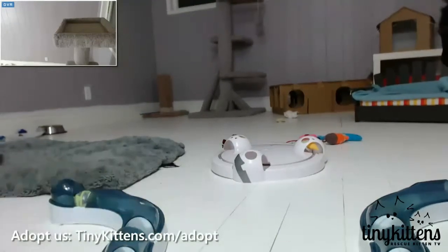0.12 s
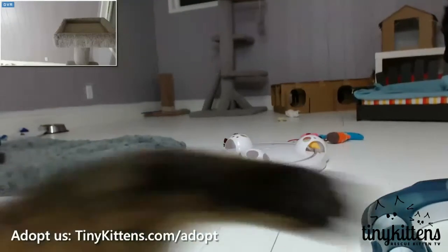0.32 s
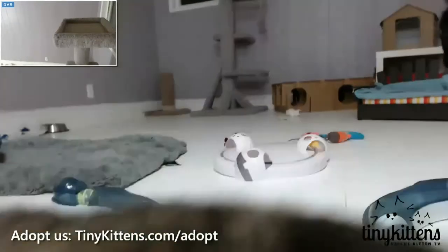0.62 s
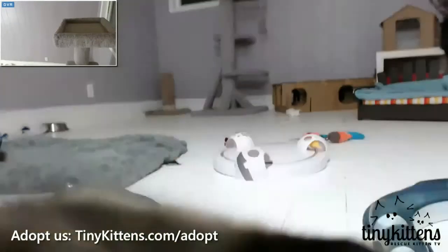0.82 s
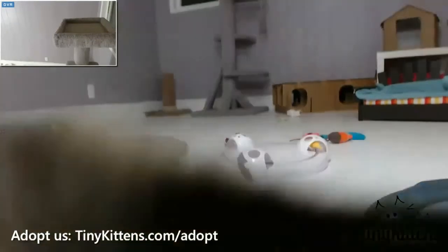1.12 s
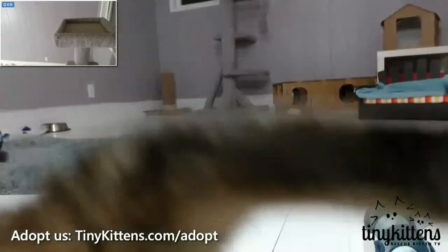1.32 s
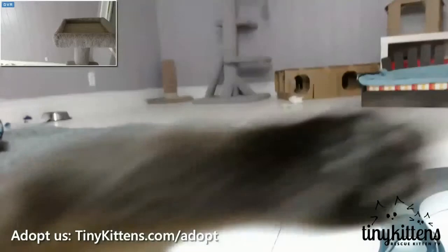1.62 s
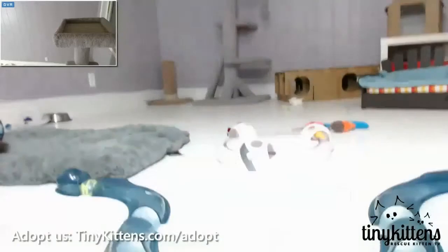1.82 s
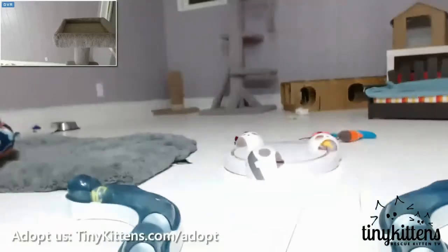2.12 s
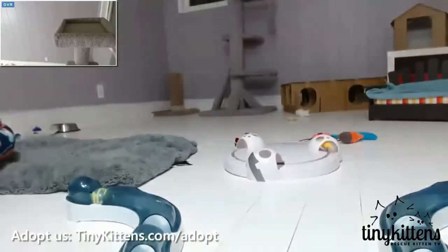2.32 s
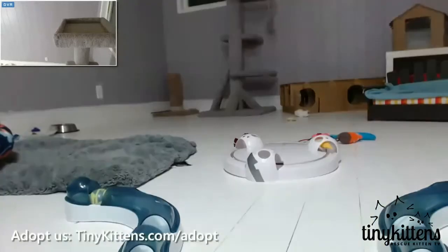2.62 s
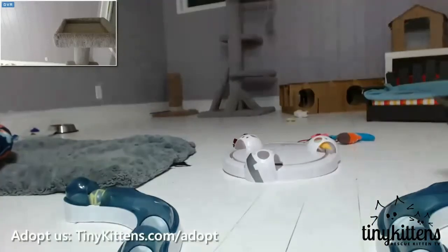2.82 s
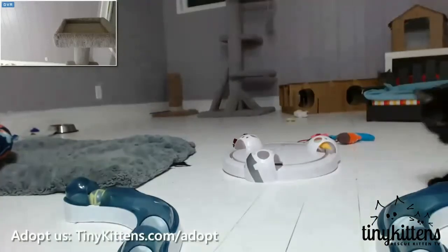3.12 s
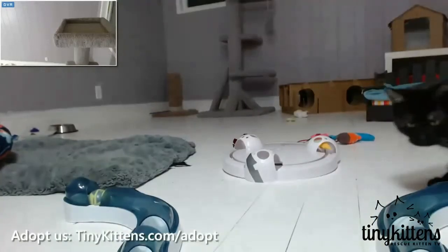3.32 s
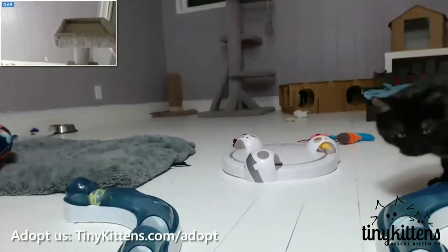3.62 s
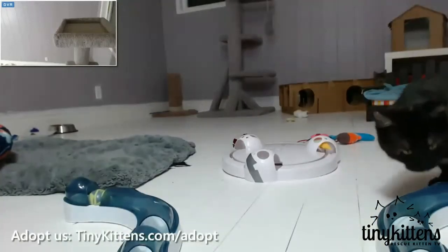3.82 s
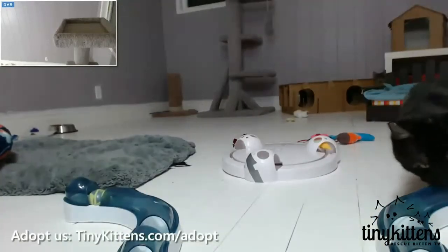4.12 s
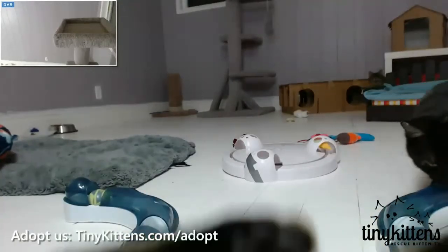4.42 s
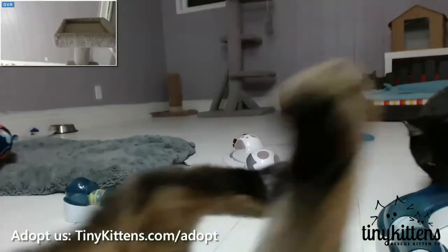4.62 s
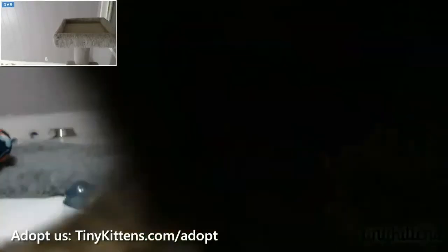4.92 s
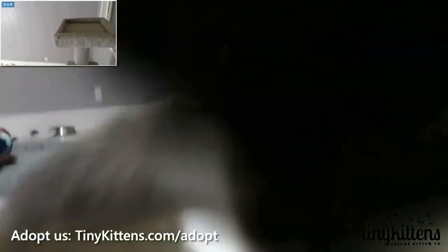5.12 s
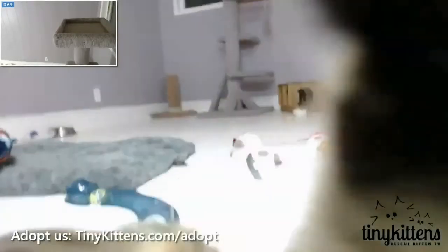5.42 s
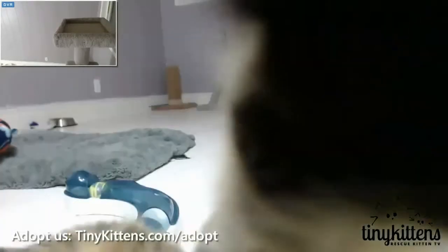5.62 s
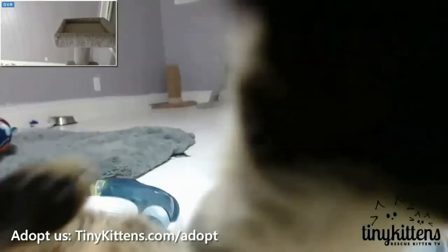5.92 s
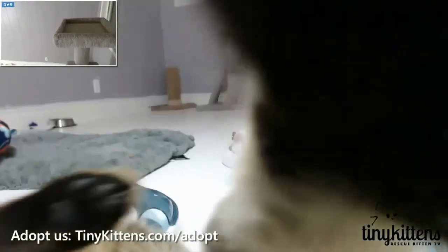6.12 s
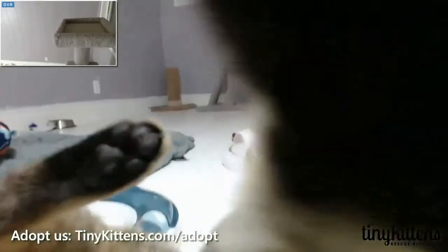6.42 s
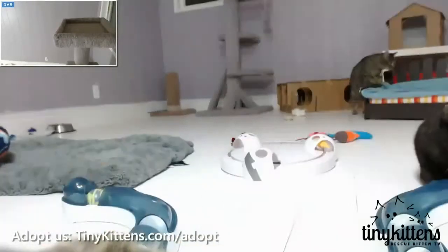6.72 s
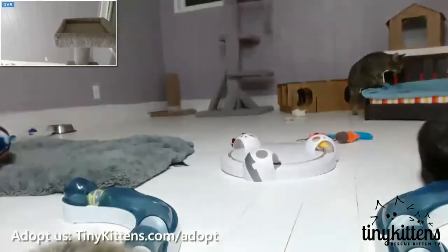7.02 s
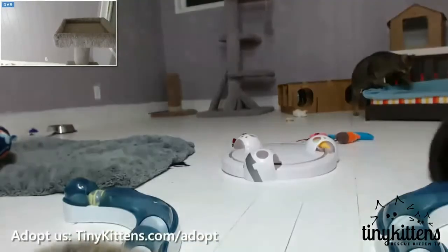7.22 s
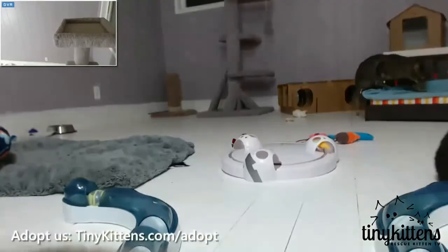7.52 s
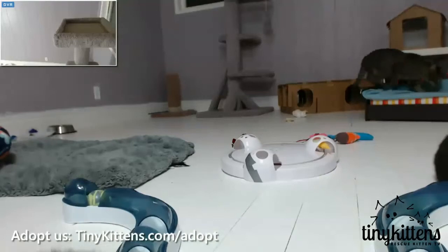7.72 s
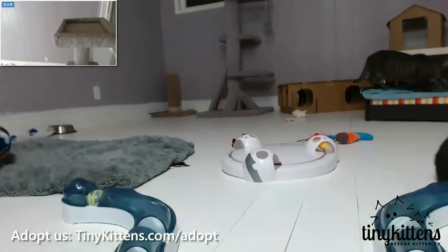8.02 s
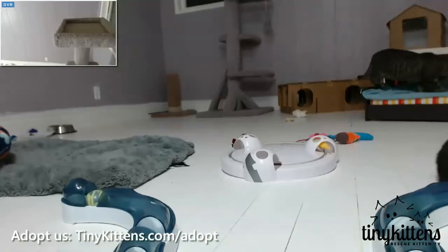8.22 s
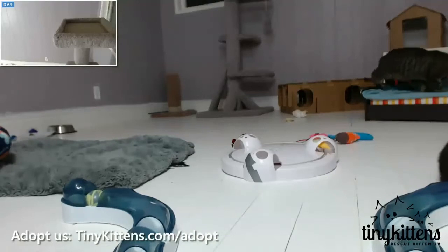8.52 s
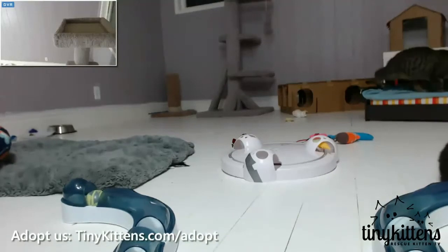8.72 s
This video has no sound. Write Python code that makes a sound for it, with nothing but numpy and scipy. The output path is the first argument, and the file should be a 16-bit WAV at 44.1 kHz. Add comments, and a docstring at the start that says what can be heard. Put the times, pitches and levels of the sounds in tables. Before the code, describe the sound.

A quiet room holds a soft low fan hum, airy noise and a very faint, high pulsing electronic whine. From about 0.15 s a cat rubs a plastic camera at its microphone: claw ticks, grainy fur strokes and small thumps until 0.7 s, then softer brushing and creaks. A low bump lands at 1.4 s, with more crackly rubbing and hollow knocks around 2.05 to 2.45 s. It thins to light rustles by 3.1 s. In the lull, a faint tap sounds at 3.5 s and a clearer echoing double tap at 4.5 s, far across the room. At 5.16 s a loud knock starts violent scraping, peaking from 5.55 to 5.85 s with distorted, overloaded blows and bright crackle. Separate hard knocks follow at 6.35 and 6.75 s, smaller clicks and soft rubbing at 7.3 to 8 s, then mostly hum until 8.8 s.

```python
"""A quiet room with a fan hum and a faint pulsing whine; soon a cat bumps and rubs a small plastic camera.
Hum and air are filtered noise, the whine is a gated sine, and slow noise is the base rocking.
Grainy noise is fur on the housing and microphone port; short noise bursts ring them as claws and creaks.
Fading low sines are blows on the base, echoing noise is distant taps; loud knocks overload the input."""
import sys
import numpy as np
from scipy import signal
from scipy.fft import rfft, irfft
from scipy.io import wavfile
from scipy.ndimage import uniform_filter1d

SR = 44100
rng = np.random.default_rng(int(sys.argv[2]) if len(sys.argv) > 2 else 0)


def persist_wave(psi):
    """Save psi, clipped to +-1, as 16-bit WAV."""
    counts = np.round(np.clip(psi, -1, 1) * 32767).astype(np.int16)
    wavfile.write(sys.argv[1], SR, np.atleast_2d(counts).T)


N = 389403  # length in samples

# Ringing tones of the plastic housing. Each row: frequency in Hz, width in Hz, gain in dB.
HOUSING_MODES = [(600, 160, -6), (880, 150, -4), (1400, 80, 0), (1900, 600, -14)]
# Ringing tones of the microphone port. Each row: frequency in Hz, width in Hz, gain in dB.
PORT_MODES = [(2690, 1100, -1.5), (3435, 810, 12.5), (5470, 500, -17)]


def undb(db):
    """Turn decibels into a plain multiplier."""
    return 10 ** (np.asarray(db) / 20)


def level(x, db):
    """Scale a sound to an average (RMS) level in dB."""
    return x * undb(db) / np.sqrt(np.mean(x ** 2))


def peak(rows, db):
    """Scale each row so that its highest point reaches a level in dB."""
    return rows * (undb(db) / np.abs(rows).max(axis=1))[:, None]


def band(x, lo_hz, hi_hz):
    """Keep mainly the frequencies between two limits."""
    return signal.sosfilt(signal.butter(2, [lo_hz, hi_hz], "band", fs=SR, output="sos"), x)


def ring(x, modes):
    """Two-pole resonances side by side, added with alternate signs."""
    total = 0
    for k, (hz, width_hz, db) in enumerate(modes):
        b, a = signal.iirpeak(hz, hz / width_hz, SR)
        total = total + (-1) ** k * undb(db) * signal.lfilter(b, a, x)
    return total


def colour(x, points):
    """Shape a spectrum by gains in dB, joined by straight lines over log frequency."""
    hz, db = np.transpose(points)
    f = np.arange(x.shape[-1] // 2 + 1) * SR / x.shape[-1] + 1  # + 1 avoids log(0)
    return irfft(rfft(x) * undb(np.interp(np.log(f), np.log(hz), db)), x.shape[-1])


def curve(table):
    """Join (seconds, value) points by straight lines over the whole scene."""
    s, values = np.transpose(table)
    return np.interp(np.arange(N) / SR, s, values)


def walk(rate):
    """Random levels held 1 / rate seconds and smoothed twice; spread near 1."""
    hold = int(SR / rate)
    steps = np.repeat(rng.standard_normal(N // hold + 1), hold)
    return 1.3 * uniform_filter1d(uniform_filter1d(steps, hold), hold)[:N]


def place(times, sounds):
    """Add each sound into the scene at its start time in seconds."""
    out = np.zeros(N + sounds.shape[1])
    for s, sound in zip(times, sounds):
        start = int(s * SR)
        out[start:start + len(sound)] += sound
    return out[:N]


def room():
    """Air and fan noise with wavering hum lines and a few thin steady tones."""
    # Spectrum of the air noise. Each row: frequency in Hz, relative density in dB per Hz.
    air_colour = [(12, -57), (20, -25), (53, -23.5), (86, -5), (145, -12), (170, -9), (381, -20),
                  (412, -28), (732, -31), (791, -34.5), (10200, -54.5), (13300, -83.5), (22000, -120)]
    # Hum of the fan. Each row: frequency in Hz, width in Hz, level in dB.
    fan_lines = [(87.7, 1.1, -52), (120, 6.2, -53), (174.8, 12, -59)]
    # Steady tones. Each row: frequency in Hz, level in dB.
    steady_tones = [(721.4, -71.5), (5459, -82), (10541, -86.5)]
    t = np.arange(N) / SR
    total = level(colour(rng.standard_normal(N), air_colour), -50)
    for hz, width_hz, db in fan_lines:
        hum = band(rng.standard_normal(N), hz - width_hz / 2, hz + width_hz / 2)
        total += level(hum * undb(1.5 * walk(4)), db)
    for hz, db in steady_tones:
        total += np.sqrt(2) * undb(db) * np.sin(2 * np.pi * hz * t)
    return total


def whine():
    """A high tone leaks from the electronics as short blips in a repeating strong-weak pattern."""
    # Strength of each blip in one round, in dB.
    blip_db = [-69, -85.5, -100, -80.5]
    whine_hz, blips_per_s = 8000, 60
    pattern_s = 3.716  # a moment when the first blip of a round is at its middle
    t = np.arange(N) / SR
    turn = (t - pattern_s) * blips_per_s + .5
    gate = np.exp(-((turn % 1 - .5) / .24) ** 4)
    strength = undb(blip_db)[np.floor(turn).astype(int) % len(blip_db)]
    return strength * gate * np.sin(2 * np.pi * whine_hz * t)


def rock():
    """The cat's weight tilts the base: slow pressure swings on the microphone, made of low noise."""
    # Strength of the rocking. Each row: time in seconds, gain in dB.
    rock_gain = [(0.0, -48), (.7, -48), (1.35, -39.5), (1.6, -45.5), (2.3, -34), (2.65, -47), (5.2, -58),
                 (5.65, -26.5), (6.1, -44.5), (8.83, -60)]
    swings = level(band(rng.standard_normal(N), 18, 66), -1)
    return undb(curve(rock_gain) + 2.5 * walk(12)) * swings


def pressure():
    """Gains of the steady lean, of the strokes that swell and fade over it, and of the treble of both."""
    # How hard the coat leans between strokes. Each row: time in seconds, gain in dB.
    lean_gain = [(0, -62), (.3, -56.5), (.45, -53), (.85, -58), (1.3, -58), (1.7, -52), (2.15, -50.5),
                 (2.6, -57), (3.5, -76), (5.05, -94), (5.25, -63.5), (5.8, -51), (5.9, -56.5), (6.2, -57.5),
                 (7.1, -63), (7.5, -58.5), (7.65, -56), (7.78, -54), (8.25, -64.5), (8.83, -66.5)]
    # Strokes of fur. Each row: middle in seconds, length in seconds, gain in dB, treble re that gain in dB.
    fur_strokes = [(0.213, 0.035, -40, -15), (0.384, 0.18, -47, -9.5), (0.489, 0.13, -43, -8),
                   (0.59, 0.038, -45, -5.5), (0.704, 0.12, -49.5, -10), (0.948, 0.15, -49.5, -9),
                   (1.085, 0.14, -44, -10.5), (1.417, 0.2, -54.5, -2.5), (1.616, 0.055, -41, -7.5),
                   (2.05, 0.1, -48.5, 1), (2.111, 0.016, -40, -12), (2.199, 0.036, -41.5, -7.5),
                   (2.835, 0.046, -44.5, -12), (3.08, 0.29, -59, -2.5), (5.109, 0.035, -45.5, -5.5),
                   (5.212, 0.092, -43, 1), (5.305, 0.039, -43, 7), (5.456, 0.15, -48.5, 4.5),
                   (5.63, 0.075, -34.5, -9), (5.687, 0.067, -28.5, -6), (5.738, 0.03, -25, 0.5),
                   (5.792, 0.12, -32.5, 2.5), (5.871, 0.02, -44.5, 7.5), (5.919, 0.039, -56, 3),
                   (6.148, 0.29, -50, -4.5), (6.323, 0.089, -50, 0), (6.483, 0.05, -51, -21),
                   (6.61, 0.15, -65.5, 8.5), (6.774, 0.091, -38.5, -6), (7.222, 0.032, -46.5, -15),
                   (7.43, 0.27, -51.5, -2), (7.59, 0.022, -54, 2), (7.73, 0.11, -53, -10),
                   (7.893, 0.11, -49, -28), (7.985, 0.1, -52.5, -32), (8.097, 0.15, -54.5, -7)]
    edge_db = -14  # gain at a stroke's ends, relative to its middle
    point = 2.0  # shape of a stroke: 1 pointed, 2 round
    lean_treble_db = -8  # relative to the lean
    t = np.arange(N) / SR
    lean = undb(curve(lean_gain))
    # add powers, so that overlapping strokes do not count double in gain
    body_power = np.zeros(N)
    treble_power = lean ** 2 * undb(2 * lean_treble_db)
    for middle, length, db, treble_db in fur_strokes:
        near = slice(max(int((middle - 2 * length) * SR), 0), int((middle + 2 * length) * SR))
        distance = np.abs(2 * (t[near] - middle) / length)  # 1 at the ends of the stroke
        power = undb(2 * (db + edge_db * distance ** point))
        body_power[near] += power
        treble_power[near] += power * undb(2 * treble_db)
    return lean, np.sqrt(body_power), np.sqrt(treble_power)


def shifting_ring(hairs, modes):
    """Hair noise rings each mode, whose strength drifts on its own."""
    return level(sum(ring(hairs, [mode]) * undb(3.5 * walk(25)) for mode in modes), 0)


def shifting_brush(hairs, lowest_hz):
    """Six neighbouring bands of hair noise, each drifting on its own, brush in shifting patches."""
    edges_hz = lowest_hz * 1.3 ** np.arange(6)
    return level(sum(band(hairs, hz, 1.3 * hz) * undb(2.2 * walk(30)) for hz in edges_hz), 0)


def rub():
    """Hairs catch and let go in dense grains; a lean rings the housing, a stroke also brushes in patches."""
    lean, stroke, treble = pressure()
    hairs = rng.standard_normal(N) * undb(4.2 * walk(500) + .8 * walk(70))
    body = shifting_ring(hairs, HOUSING_MODES)
    fizz = shifting_ring(hairs, PORT_MODES)
    brush = shifting_brush(hairs, 480)
    sheen = shifting_brush(hairs, 1900)
    stroke_sound = undb(-5) * body + undb(-4.0) * brush
    dull = band(lean * body + stroke * stroke_sound, 300, 1700)
    bright = band(undb(-3.5) * fizz + undb(-6) * sheen, 1300, 6800)
    return dull + treble * bright


def knocks():
    """Claw ticks and creaks: a burst of tiny slips rings housing and port; a faint rattle follows."""
    # Each row: start in seconds, housing peak in dB, port peak in dB, contact length in seconds.
    knock_rows = [(0.14, -29, -45, 0.0022), (0.194, -16, -24, 0.00068), (0.198, -24.5, -23.5, 0.004),
                  (0.357, -16, -37, 0.001), (0.362, -40, -34, 0.0029), (0.422, -19, -37, 0.0079),
                  (0.499, -22, -33.5, 0.0057), (0.504, -16.5, -34, 0.0021), (0.558, -33.5, -42, 0.0036),
                  (0.72, -37, -60, 0.0037), (0.836, -38, -57, 0.0025), (1.042, -34, -56, 0.00095),
                  (1.116, -28, -64, 0.0015), (1.197, -46, -67, 0.003), (1.305, -33, -47, 0.0057),
                  (1.325, -32.5, -48, 0.0091), (1.365, -30.5, -41, 0.0032), (1.396, -34.5, -36.5, 0.016),
                  (1.562, -24, -41.5, 0.006), (1.667, -34, -44, 0.0022), (1.711, -32.5, -42, 0.0026),
                  (1.726, -35.5, -44, 0.0052), (1.773, -31, -40.5, 0.0026), (1.796, -33, -41, 0.0051),
                  (1.826, -27.5, -50, 0.0029), (1.865, -32.5, -42, 0.0039), (1.918, -24, -49.5, 0.01),
                  (2.035, -32, -47, 0.0067), (2.173, -37, -40, 0.0036), (2.258, -12, -40, 0.0015),
                  (2.267, -24.5, -35, 0.0089), (2.277, -95, -17.5, 0.0024), (2.376, -29, -54, 0.0019),
                  (2.406, -18.5, -27, 0.0029), (2.637, -39.5, -51, 0.017), (2.703, -38, -41.5, 0.002),
                  (2.823, -36, -50, 0.005), (3.012, -33, -73, 0.0048), (3.06, -27.5, -40, 0.0084),
                  (3.52, -35, -33.5, 0.0051), (5.162, -2, -10.5, 0.0028), (5.167, -13, -8, 0.0021),
                  (5.231, -10, -25.5, 0.0015), (5.242, -25, -39, 0.004), (5.299, -30, -33, 0.0011),
                  (5.409, -23, -28, 0.0096), (5.469, -20, -17, 0.0045), (5.529, -13, -19.5, 0.0024),
                  (5.578, 4.5, -10, 0.0021), (5.581, -6, -6.5, 0.0042), (5.587, -12.5, -12.5, 0.0092),
                  (5.697, -16, -39.5, 0.0018), (5.753, -3.5, -10.5, 0.0016), (5.845, -13, -13, 0.0031),
                  (5.922, -27, -36, 0.00078), (5.992, -42, -30.5, 0.00064), (6.082, -26.5, -44, 0.012),
                  (6.35, -9, -15.5, 0.0023), (6.597, -41, -32.5, 0.0022), (6.747, -23.5, -38.5, 0.0014),
                  (6.756, -7.5, -22, 0.0027), (6.76, -8, -10.5, 0.0067), (6.783, -15, -13, 0.0023),
                  (7.015, -34, -44, 0.0015), (7.323, -16.5, -26, 0.0044), (7.401, -34, -61, 0.0016),
                  (7.414, -19.5, -24, 0.0018), (7.443, -28, -43, 0.0068), (7.696, -27, -37, 0.0073),
                  (7.813, -24.5, -35.5, 0.0055), (7.973, -38.5, -63, .003)]
    s, db, port_db, contact = np.transpose(knock_rows)
    t = np.arange(4096) / SR
    burst = np.exp(-(t / np.clip(contact, .0003, .05)[:, None]) ** 2)
    rattle = undb(-25.5) * np.exp(-t / 0.012)
    chance = rng.standard_normal((len(s), 2, len(t)))
    slips = chance[:, 0] * undb(1.5 * chance[:, 1]) * (burst + rattle)
    # a hard blow shakes the whole shell, so its clear modes stand out less
    shell = undb(22.5 + 1.4 * db)[:, None] * slips
    body = band(band(ring(slips, HOUSING_MODES) + shell, 720, 2660), 190, 2800)
    # the more the housing outweighs the port, the weaker the port's top end
    top = peak(band(slips, 4000, 10000), 0.23 * (port_db - db))
    port = peak(band(ring(slips, PORT_MODES), 2000, 4500), 0) + top
    return place(s, peak(body, db) + peak(port, port_db))


def thumps():
    """Each blow swings the base, widest early on, slowing and wavering as it dies; a hollow rumble trails."""
    # Blows on the base. Each row: start in seconds, strength in dB, ring in Hz,
    # time to fade by 60 dB in seconds, peak of the rumble relative to the strength in dB.
    blows = [(0.192, -20.5, 80, 0.061, -5), (1.017, -29, 102, 0.052, -34), (1.302, -23, 86, 0.17, -0.5),
             (1.398, -9.5, 72.5, 0.024, -27), (1.618, -30, 81.3, 0.34, -15), (1.915, -35.5, 88, 0.8, -7),
             (2.029, -23, 79, 0.049, -16), (2.091, -29, 101, 0.15, -32), (2.255, -16, 77, 0.21, 0),
             (2.38, -18, 151, 0.11, -1.5), (2.435, -10.5, 268, 0.061, -7.5),
             (2.448, -38.5, 270, 0.39, 16.5), (2.593, -31.5, 93, 0.42, -20), (3.061, -31, 140, 0.066, 5.5),
             (5.161, -12.5, 121, 0.03, -5), (5.432, -25, 47, 0.16, -11.5), (5.577, -12, 320, 0.047, 4),
             (5.589, -6, 261, 0.019, -3.5), (5.676, -25.5, 148.3, 0.22, 8.5), (5.73, -16, 200, 0.035, -9),
             (5.752, -12.5, 300, 0.031, -4), (5.81, -17.5, 160.6, 0.3, -9.5), (6.314, -18, 45.7, 0.16, -9),
             (6.757, -22.5, 106.6, 0.087, 7.5), (6.78, -15.5, 60.5, 0.12, -22),
             (7.324, -22.5, 120, 0.035, -12), (7.414, -26.5, 45, 0.18, -12), (7.51, -34, 116, 0.22, -42),
             (7.702, -34, 50, 0.35, -1.5)]
    s, db, hz, t60, rumble_db = np.array(blows).T[:, :, None]
    t = np.arange(16384) / SR
    fade = np.exp(-np.log(1000) * t / t60) * (1 - np.exp(-t * hz / 0.096))
    chance = rng.standard_normal((len(s), 2, len(t)))
    drift = peak(np.cumsum(band(chance[:, 0], 8, 40), axis=1), 3)  # radians
    waver = drift * np.minimum(t / .04, 1)
    early = 0.0024 * (1 - np.exp(-t / 0.0057))  # the swing starts fast, then settles to its pitch
    swing = np.sin(2 * np.pi * hz * (t + early) + waver) * (0.79 * fade + 2.6 * fade ** 4)
    rumble = band(band(band(chance[:, 1], 130, 620) * fade ** 0.83, 130, 700), 90, 1200)
    return place(s[:, 0], undb(db) * (swing + peak(rumble, rumble_db[:, 0])))


def far_taps():
    """Taps across the room arrive mostly as their echo; the tapped thing rings on in it."""
    # Each row: start in seconds, strength in dB, time for the tail to fade by 60 dB in seconds,
    # tilt in dB per octave.
    tap_rows = [(3.524, -49.5, 0.7, 15), (4.52, -35, 0.36, 5.5), (4.533, -42.5, 0.82, 4.5)]
    # Spectrum of the echo before its tilt. Each row: frequency in Hz, relative density in dB per Hz.
    echo_colour = [(470, -52), (800, -2), (1400, 5.5), (2120, 2), (3080, -10.5), (5220, -15), (11000, -37),
                   (22000, -120)]
    # Tones of what is tapped. Each row: frequency in Hz, gain in dB, time to fade by 60 dB in seconds.
    tapped_modes = [(1540, -19, 0.24), (1625, -12.5, 0.45), (2200, -17, 0.38), (3320, -13.5, 0.45),
                    (5950, -3, 0.12), (7500, -16, .1)]
    s, db, t60, tilt_db = np.array(tap_rows).T[:, :, None]
    t = np.arange(32768) / SR
    hz, shape_db = np.transpose(echo_colour)
    echo = []
    for tilt in tilt_db:
        tilted = np.c_[hz, shape_db + tilt * np.log2(hz)]
        echo.append(colour(rng.standard_normal(len(t)), tilted))
    tail = np.exp(-np.log(1000) * t / t60)
    onset = np.exp(-t / 0.0043)
    echo = peak(np.array(echo), 0) * (tail + onset)
    strike = echo * np.exp(-t / .07)
    rings = 0
    for mode_hz, gain_db, decay in tapped_modes:
        tone = np.sin(2 * np.pi * mode_hz * t) * np.exp(-np.log(1000) * t / decay)
        rings = rings + undb(gain_db) * signal.fftconvolve(strike, [tone])[:, :len(t)]
    return place(s[:, 0], undb(db) * (echo + peak(rings, -11)))


def scene():
    """All layers added into one channel."""
    return (room() + whine() + rock() + rub() + knocks() + thumps() + far_taps())[None]


def record(dry):
    """The input flattens loud peaks; the treble rolls off before the top is cut."""
    overload, top_hz = 0.47, 11789  # overload is the amplitude that peaks cannot pass
    hot = dry / (1 + (dry / overload) ** 6) ** (1 / 6)
    soft = signal.sosfilt(signal.butter(16, 10350, fs=SR, output="sos"), hot)
    return signal.sosfilt(signal.ellip(8, .2, 70, top_hz, fs=SR, output="sos"), soft)


dry = scene()
out = record(dry)
persist_wave(out)
```